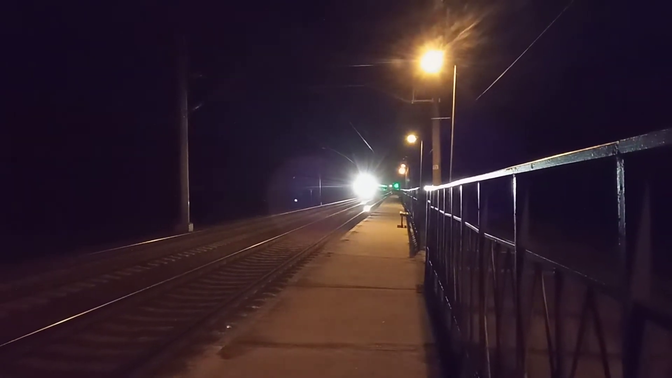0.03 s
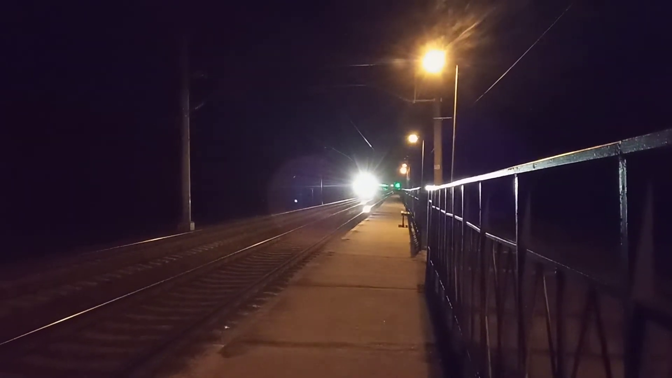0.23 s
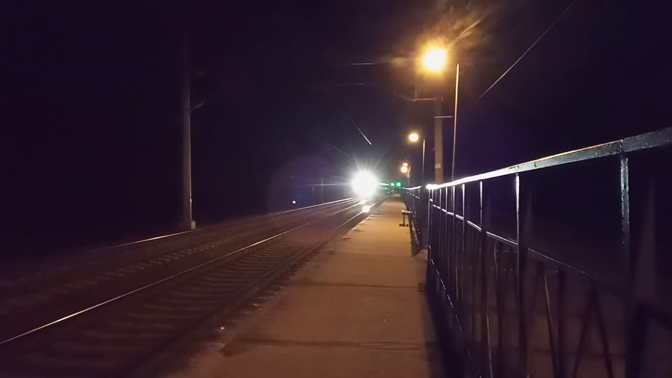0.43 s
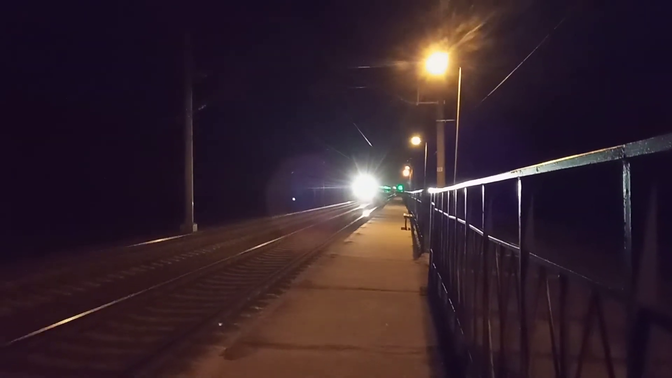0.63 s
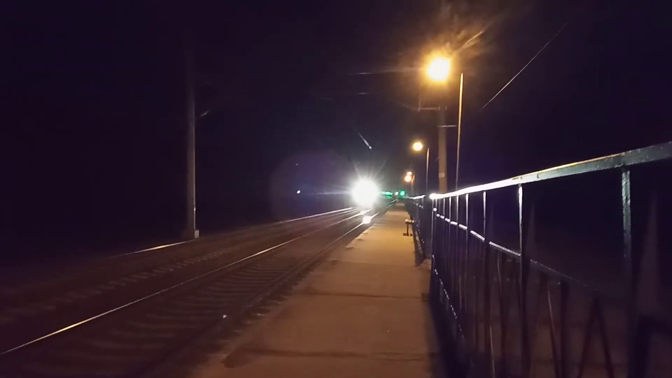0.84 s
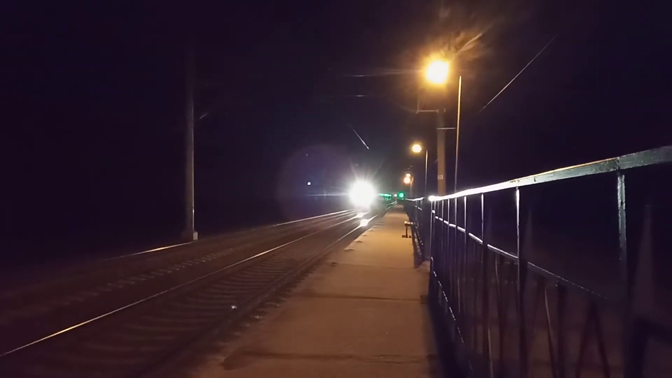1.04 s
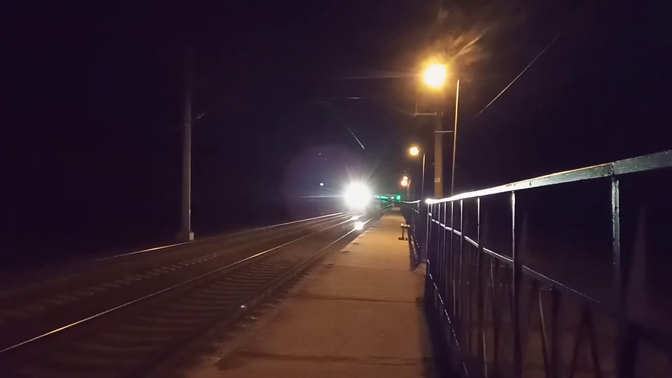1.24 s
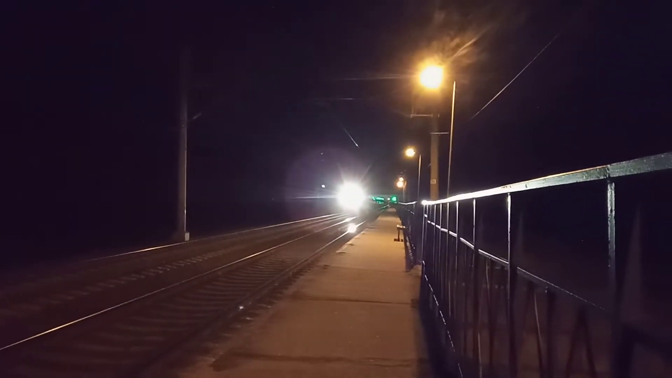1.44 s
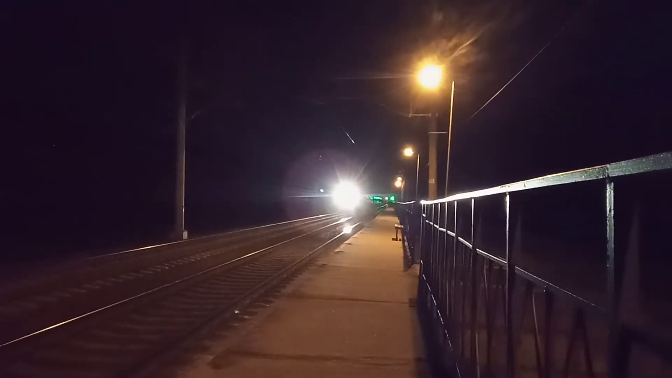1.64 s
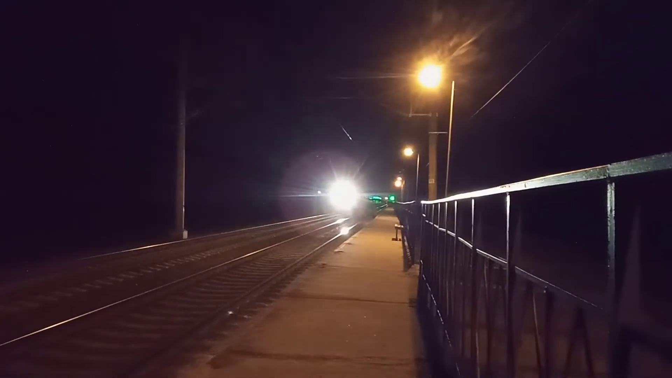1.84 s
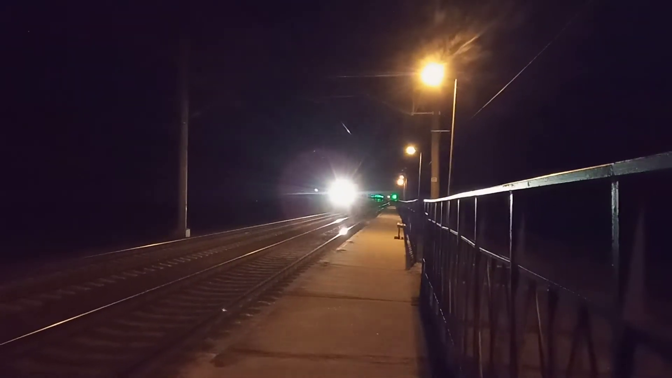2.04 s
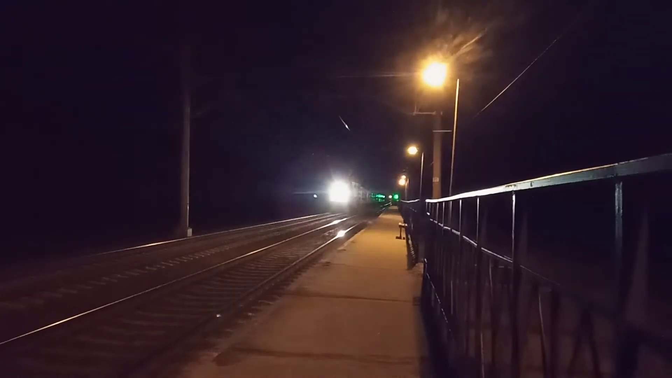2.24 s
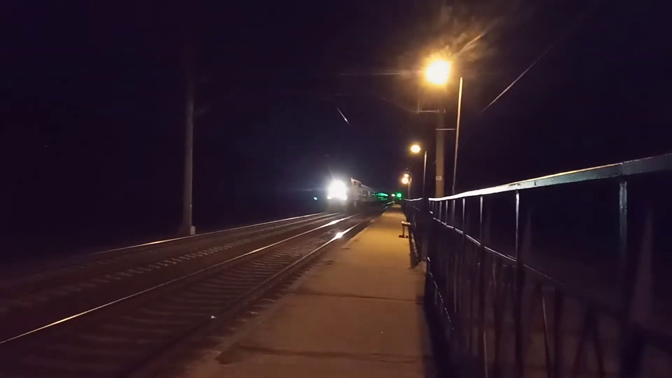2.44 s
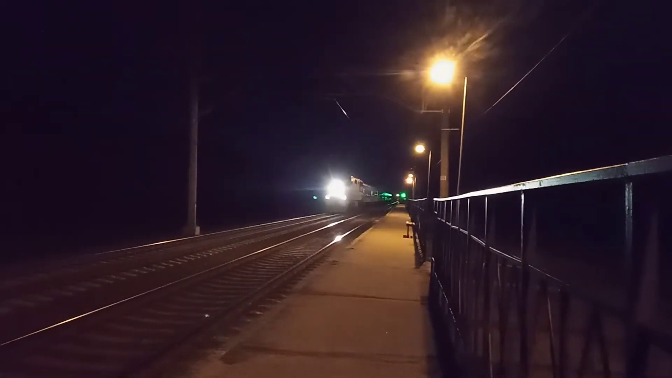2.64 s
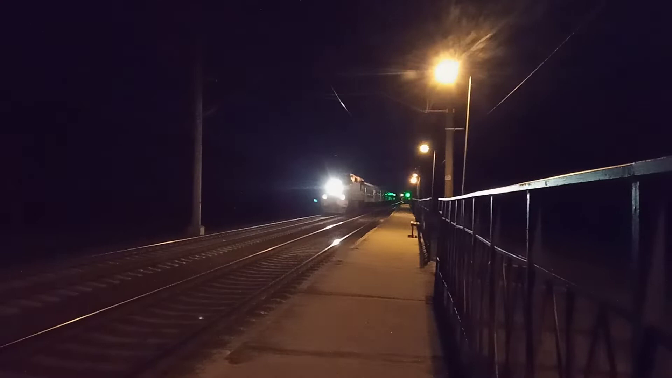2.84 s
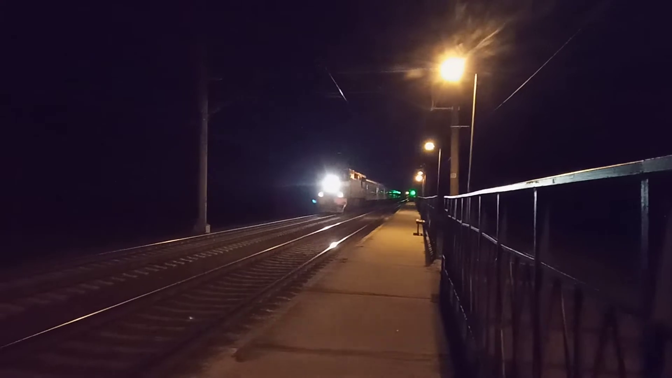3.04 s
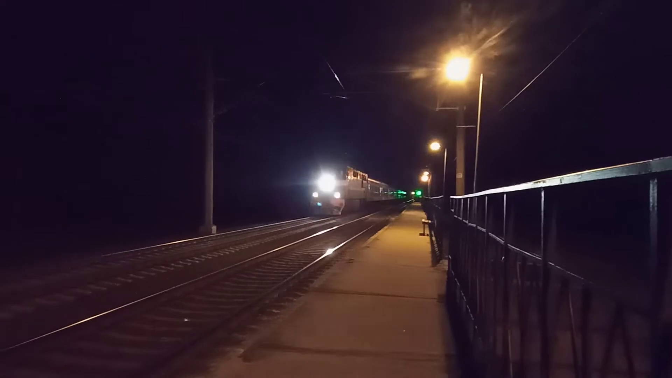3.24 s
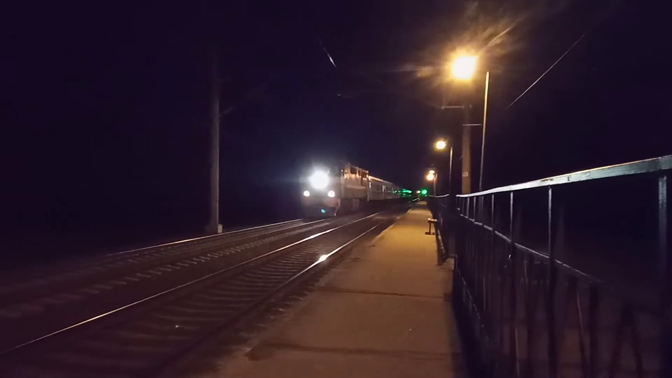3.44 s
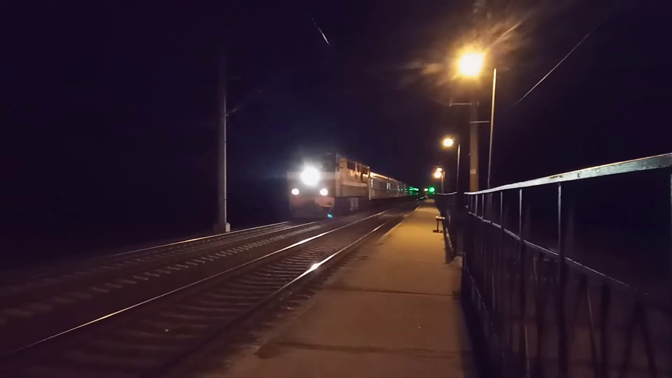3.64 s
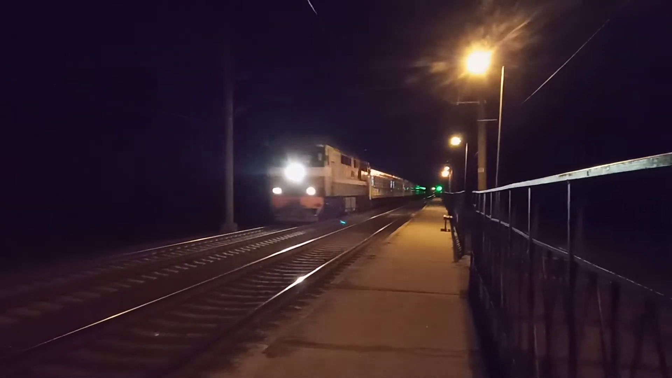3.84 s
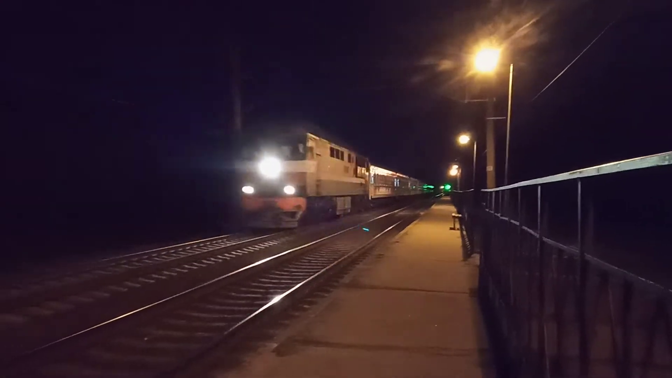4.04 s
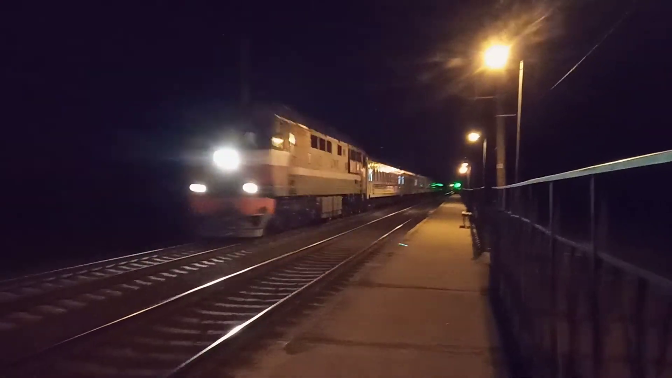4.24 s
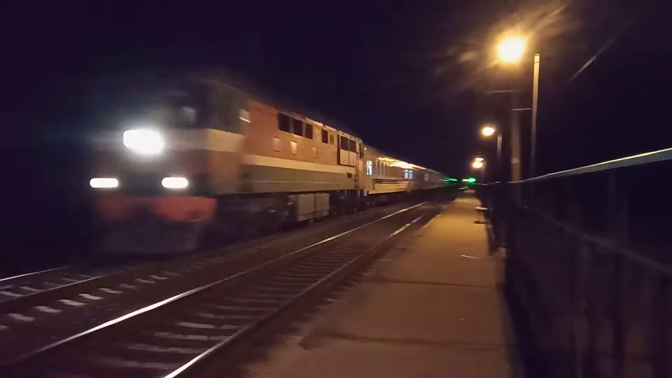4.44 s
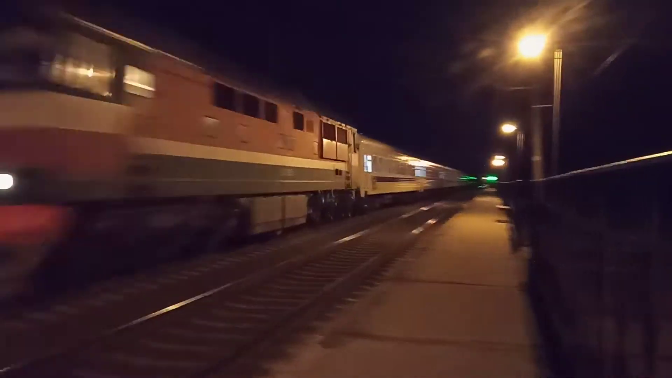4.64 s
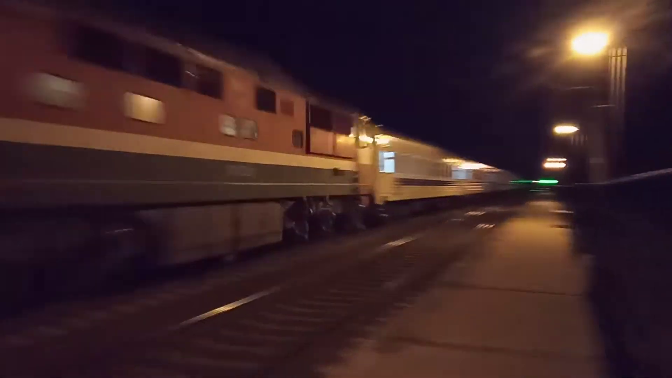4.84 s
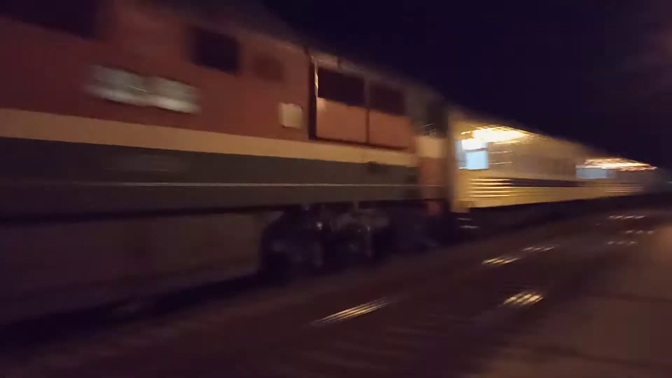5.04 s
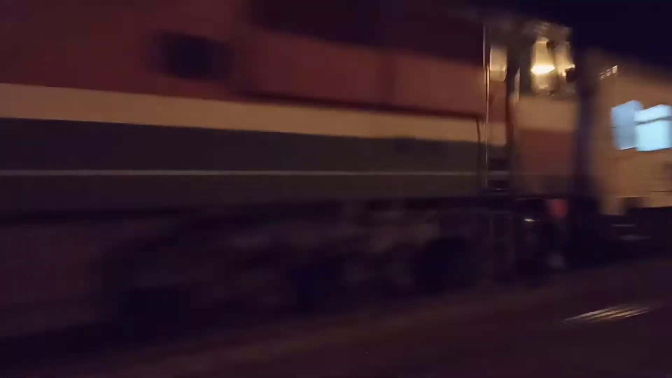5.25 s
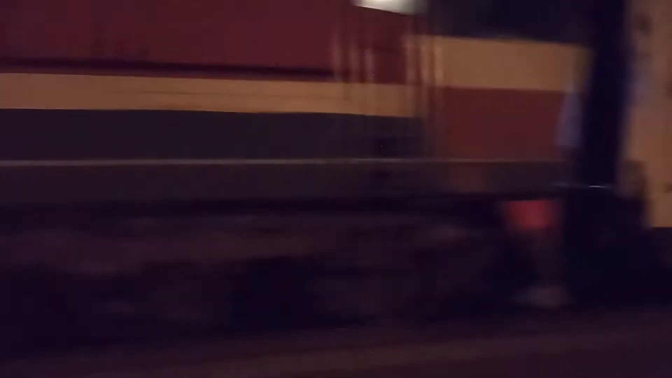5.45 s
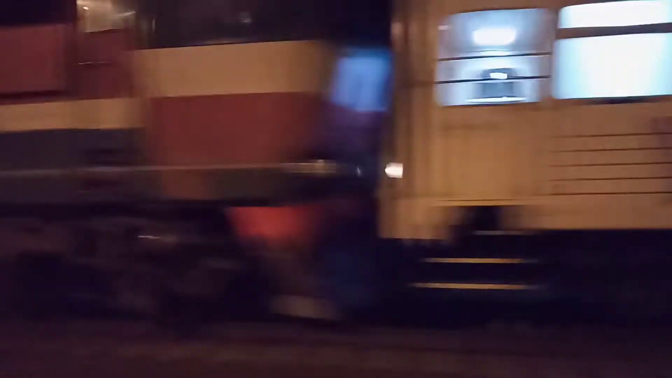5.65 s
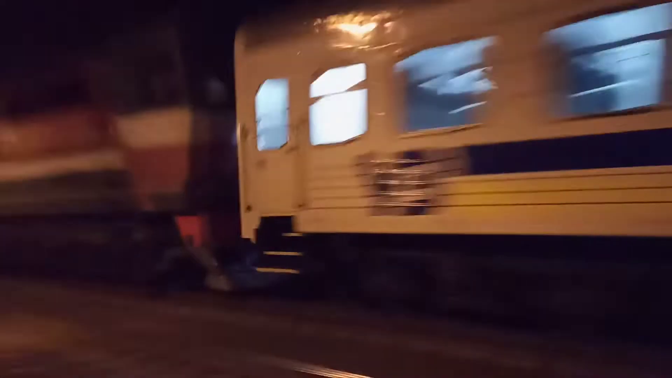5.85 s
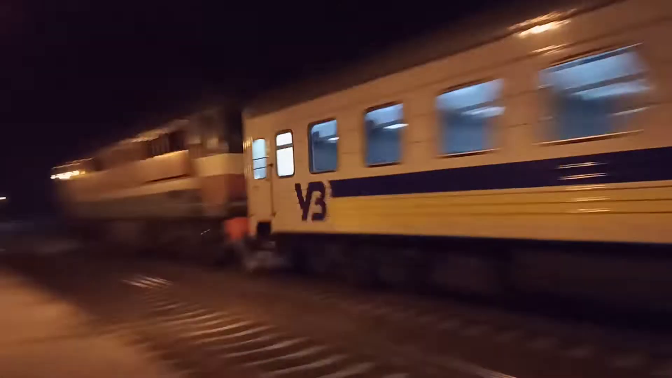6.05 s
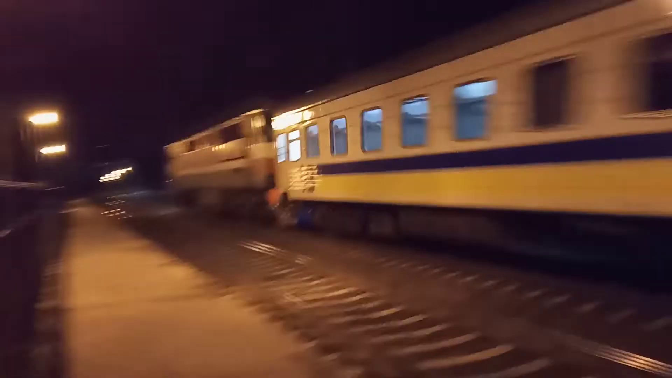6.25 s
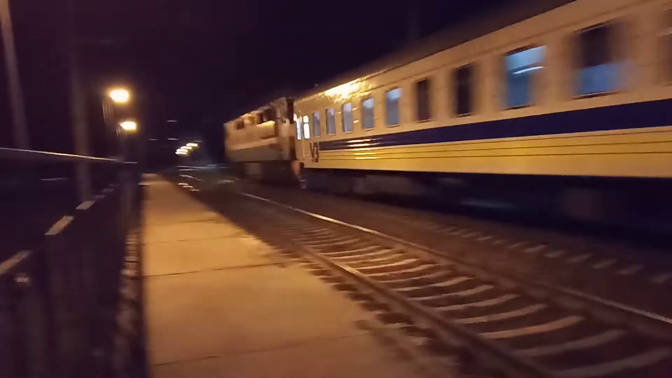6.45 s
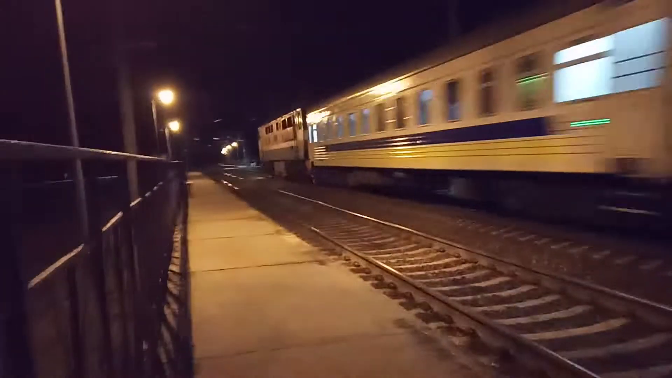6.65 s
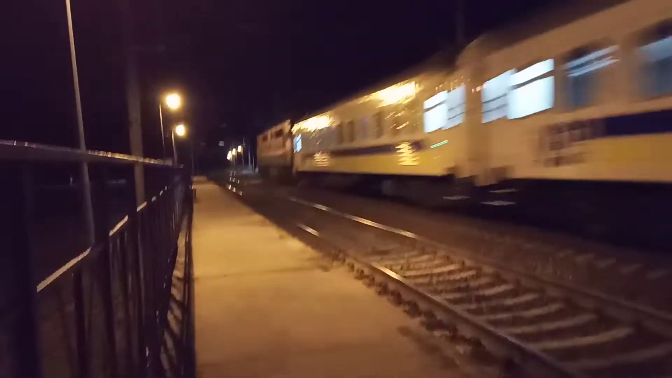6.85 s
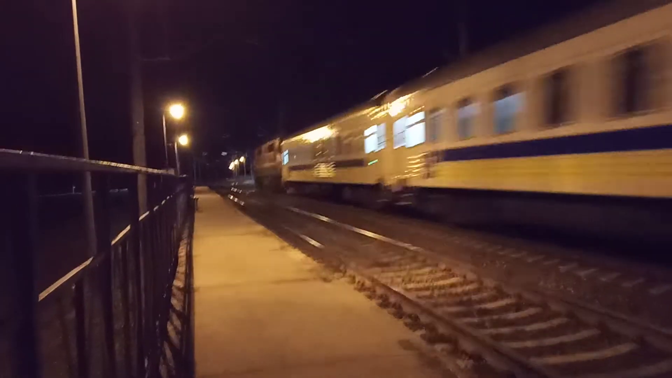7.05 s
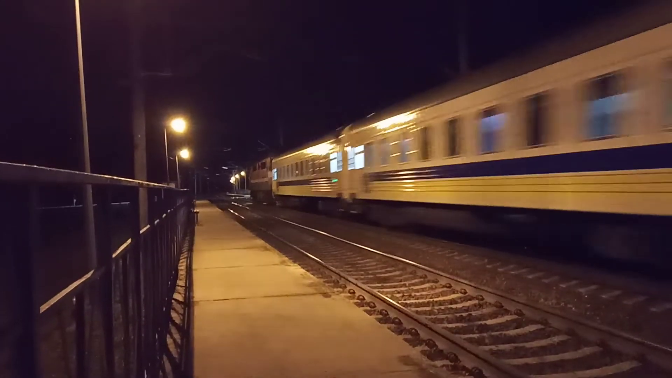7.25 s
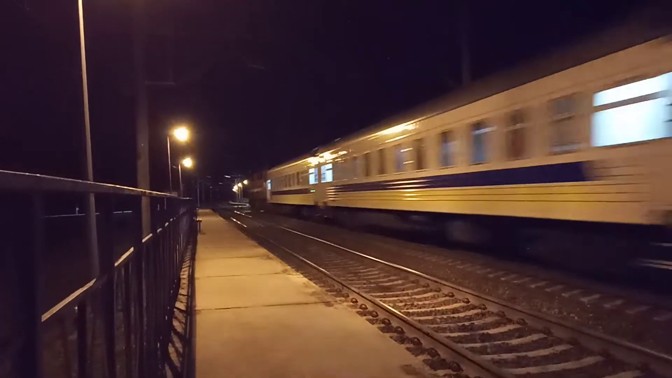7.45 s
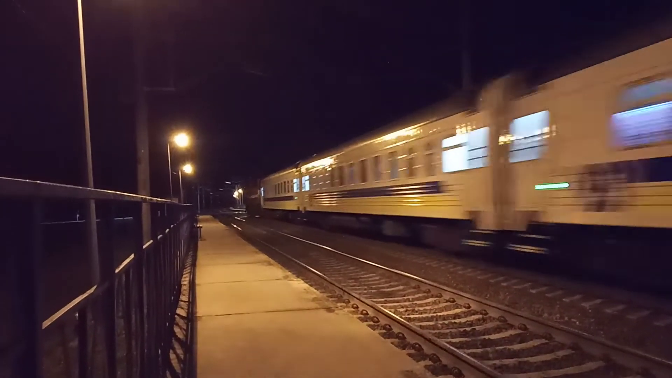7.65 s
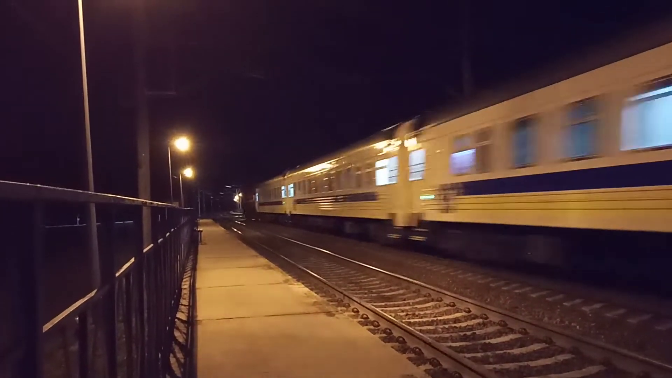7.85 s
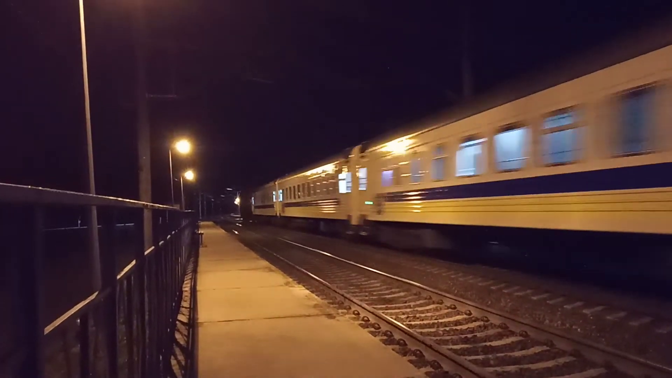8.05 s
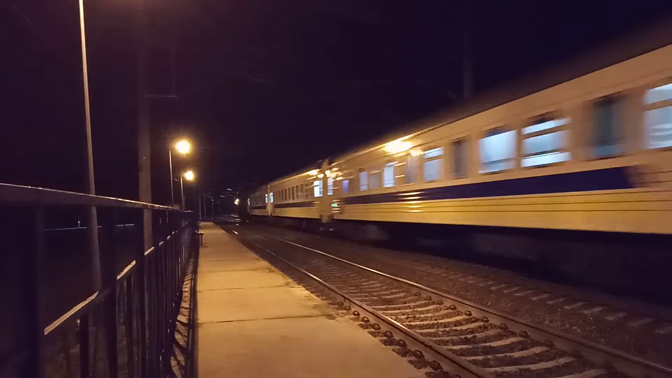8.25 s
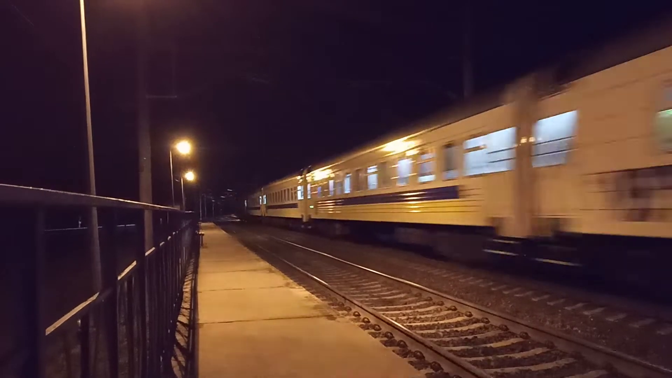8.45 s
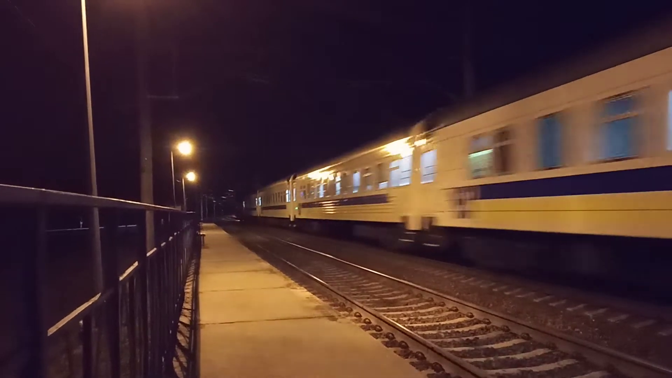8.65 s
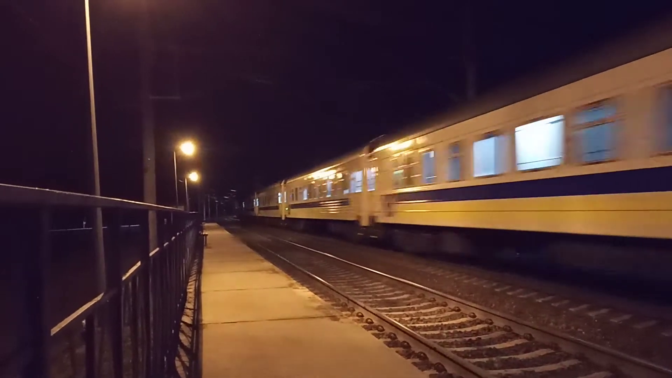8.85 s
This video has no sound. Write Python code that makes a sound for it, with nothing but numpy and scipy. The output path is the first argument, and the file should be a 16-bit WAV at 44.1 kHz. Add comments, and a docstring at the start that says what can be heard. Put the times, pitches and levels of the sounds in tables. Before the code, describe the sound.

Rails sing as a diesel train approaches, its throbbing engine passing close, followed by coaches roaring and thudding along the track.

```python
"""A station platform at night, a phone microphone 6.8 m from the track, a diesel train running through.
From far down the line the rails sing and tick with the wheel noise carried in the steel. The exhaust
throbs closer and drops in pitch, with the turbocharger whistle and fan growl, as the engine passes the
microphone at about 5.3 s. Then the coaches, close up: wheels roar, ring and thud over the rail welds."""
import sys
import numpy as np
from scipy import signal
from scipy.fft import rfft, irfft, next_fast_len
from scipy.io import wavfile

SR = 44100
rng = np.random.default_rng(int(sys.argv[2]) if len(sys.argv) > 2 else 0)


def master(y):
    """Save y as 16-bit WAV."""
    cut = np.clip(np.atleast_2d(y).T, -1, 1)
    pcm = np.round(cut * 32767)  # scale
    wavfile.write(sys.argv[1], SR, pcm.astype(np.int16))


N = 392931
T = np.arange(N) / SR
FREQS = np.fft.rfftfreq(next_fast_len(N, True), 1 / SR)

TRAIN_M_PER_S, SOUND_M_PER_S = 30.2, 343.
TRACK_M, ABREAST_S = 6.8, 5.33  # microphone to track; engine level with the microphone
FIRST_BOGIE_S = 5.73  # first coach bogie at the near weld
COACH_S, BOGIE_S, AXLE_S = .831, .574, .081  # coach to coach, front to rear bogie, axle to axle

# bands the rails carry ahead of the train: f/Hz, width/Hz, level/dB before loss and fade, loss/dB per 100 m
RAIL_BANDS = [(284, 103, -44, 3), (466, 137, -37.5, 9.5), (910, 890, -37.5, 5), (1254, 91, -34, 23),
              (1488, 135, -35.5, 8), (1660, 120, -41.5, 5.5), (2265, 130, -43.5, 14),
              (2640, 220, -44.5, 13.5), (3340, 330, -40.5, 11.5), (4150, 660, -49.5, 8),
              (4950, 380, -44, 17.5), (6680, 270, -41, 21.5), (7420, 610, -43, 22), (8830, 580, -43.5, 24),
              (9560, 250, -52.5, 8), (10500, 1100, -48.5, 14.5), (12020, 1000, -51, 4),
              (13400, 500, -56, 3), (14300, 800, -54, 1), (15500, 900, -57, 4)]
# the rail song fades as the train draws level: t/s, gain/dB
RAIL_SONG_FADE = [(0, -1.5), (2.5, -0.5), (4.3, -0.5), (4.9, -6), (5.8, -14.5), (8.9, -21)]
# exhaust lines: multiple of the four-stroke cycle rate, relative level/dB
EXHAUST_LINES = [(5, -21), (6, -29), (7, -16), (8, -4), (9, -10.5), (10, -35), (11, 1.5), (12, -8.5),
                 (13, -7.5), (14, -34), (15, -17), (16, -10.5), (17, -48), (18, -25), (19, -8), (20, -10),
                 (21, -24), (22, -19), (29, -19), (32, -11.5), (34, -19), (35, -16), (36, -19)]
# exhaust thrown back from far down the line: t/s, level/dB
EXHAUST_ECHO = [(0, -67), (4.5, -64), (5.8, -37.5), (6.4, -38), (7.2, -44.5), (8.9, -51.5)]
# noise spectra of exhaust gas, wheels, bogies and track bed: f/Hz, relative level/dB
BOOM_SPECTRUM = [(90, 1), (130, -12), (160, -5.5), (190, -5.5), (249, -0.5), (296, -5.5), (335, -18),
                 (390, -15)]
ROAR_SPECTRUM = [(330, -11), (370, -13.5), (450, -5), (492, -3.5), (570, -4.5), (630, 1), (693, -2),
                 (771, -8), (1050, -14), (1130, -14), (1270, -7), (1500, -17)]
WHEEL_SPECTRUM = [(650, -48), (1100, -32), (1240, -26.5), (1420, -2.5), (1590, 0.5), (1880, -5), (2130, -5),
                  (2380, -12.5), (2620, -31), (2900, -15.5), (3770, -43), (6380, -120)]
HISS_SPECTRUM = [(2200, -14), (2500, 0), (2680, -4), (3320, -2.5), (3800, -2), (4250, -4.5), (4600, -3.5),
                 (4950, -8), (5250, -6), (6600, -6), (7900, -16.5), (10000, -16), (11800, -24.5),
                 (13200, -26), (15700, -33)]
RUMBLE_SPECTRUM = [(55, -40), (76, -21), (102, -19), (145, -0.5), (231, 1), (260, -2.5), (327, -9),
                   (400, -8.5), (450, -7)]
BALLAST_SPECTRUM = [(190, -13), (330, -12.5), (597, -1.5), (798, -6.5), (895, -4.5), (1180, -10.5),
                    (1310, -7), (1400, -1.5), (1820, -23), (3080, -120)]
# wheel modes of all the coaches together: f/Hz, width/Hz, level/dB against the hiss
SHEEN_MODES = [(3130, 190, -5), (4210, 430, 0), (4920, 120, -10.5)]
# each source going by the microphone:
# loudest t/s, base level/dB, reach/m, loss/dB per doubling of distance coming, the same going
THROB_PASSBY = (5, -27.5, 21.5, 7, 22)
BOOM_PASSBY = (5, -26, 20, 10, 12)
ROAR_PASSBY = (5, -24, 9.5, 5.5, 8.5)
FAN_PASSBY = (5.33, -29.3, 14.5, 14.5, 16)
RUMBLE_PASSBY = (6.5, -36, 15, 24.5, 0.7)
# rolling noise, same columns: a row for the locomotive, a row for the line of coaches
WHEEL_PASSBY = [(4.95, -37.5, 20, 10.3, 4), (6.12, -28.5, 9, 7.7, 0)]
HISS_PASSBY = [(5.2, -38.5, 32.4, 17.6, 37), (6, -37, 12, 11, 0)]
BALLAST_PASSBY = [(5.5, -25, 5.7, 14, 5), (6.3, -30.5, 12.7, 14, 0)]
# turbocharger whistle, same columns: a row per partial
TURBO_PASSBY = [(5.09, -38.5, 23.4, 16.5, 20), (5.28, -37.5, 5.9, 11, 14), (5.25, -50, 5.6, 14, 18)]
# the fan swells at each end of the locomotive: t/s, half length/s, gain/dB
GROWL_SWELLS = [(4.84, .09, 13.5), (5.53, .1, 7.5)]
# the whistle flares as the engine's side sweeps past: t/s, half length/s, partial, gain/dB
WHISTLE_FLARES = [(4.87, .045, 1, 5), (5.218, 0.024, 1, 17), (5.47, .055, 1, 12), (5.303, 0.022, 2, 9.5)]
# the locomotive's axles at the near weld: t/s
LOCO_AXLE_TIMES = [5.07, 5.174, 5.43, 5.531]
# welds by the platform: delay/s after the near one, relative level/dB, clank/dB against the thud
PLATFORM_WELDS = [(0, -20.5, -8.5), (.155, -24, -3)]
# modes of the track under an axle: f/Hz, t60/s, relative level/dB
THUD_MODES = [(139, 0.089, -0.5), (188, 0.055, 10.5), (227.5, 0.098, 4), (254.3, 0.13, -2)]
# modes of every coach bogie: f/Hz, delay/s after it meets the near weld, relative level/dB
BOGIE_MODES = [(1530, 0.24, -37), (3330, .16, -35.5), (4280, -.06, -36), (4950, .13, -36)]
# single wheels ringing briefly as they pass, some loud, some faint:
# t/s, half length/s, f/Hz, relative level/dB
SINGLE_WHEEL_RINGS = [(5.235, .03, 5120, -39), (5.66, .08, 5230, -41), (5.66, 0.094, 4310, -30.5),
                      (5.7, 0.089, 3510, -28.5), (5.85, 0.046, 4020, -32), (5.87, .04, 4800, -46),
                      (5.902, .1, 1477, -28), (6.201, 0.096, 1665, -24), (6.72, .06, 4950, -35),
                      (8.6, 0.11, 3750, -34), (8.62, .1, 5450, -38), (8.78, .06, 4280, -38),
                      (8.85, .09, 3480, -33)]
# the track bed roars up once under each coach: t/s, half length/s, gain/dB
TRACK_BED_SURGES = [(5.97, 0.14, 4.5), (6.854, 0.14, 0.6), (7.72, 0.12, 3.5), (8.42, 0.15, 2)]


def undb(db):
    """Decibels to gain."""
    return 10 ** (np.asarray(db) / 20)


def fader(points):
    """Level in dB per sample, drawn through (t/s, level/dB) points."""
    return np.interp(T, *np.transpose(points))


def bell(s, half_s):
    """A smooth bump of height 1 around a moment."""
    return np.exp(-((T - s) / half_s) ** 2 / 2)


def walk(rate, part=slice(None)):
    """A smooth random drift that turns rate times a second; spread 1."""
    knots = rng.standard_normal(4096)
    place = T[part] * rate
    k = place.astype(int)
    ease = np.sin(np.pi / 2 * (place - k))
    return knots[k % len(knots)] * np.sqrt(1 - ease ** 2) + knots[(k + 1) % len(knots)] * ease


def rough_tone(phase, rate, part=slice(None)):
    """A tone whose size and phase wander rate times a second; rms 1."""
    return walk(rate, part) * np.sin(phase) + walk(rate, part) * np.cos(phase)


def noise(gain, band=slice(None)):
    """Noise with a gain per frequency; rms 1 inside the band."""
    bins = gain * np.exp(2j * np.pi * rng.random(len(FREQS)))
    return irfft(bins)[:N] * len(FREQS) * np.sqrt(2 / np.sum(gain[band] ** 2))


def coloured(spectrum, low_hz, high_hz):
    """Noise shaped by (f/Hz, level/dB) points; rms 1 between low_hz and high_hz."""
    hz, db = np.transpose(spectrum)
    gain = undb(np.interp(np.log(FREQS + 1), np.log(hz), db, left=-120, right=-120))
    return noise(gain, (FREQS > low_hz) & (FREQS < high_hz))


def resonance(hz, width_hz, comb=1):
    """Noise in one resonance, optionally split into lines by a comb of gains."""
    return noise(comb / (1 + ((FREQS - hz) / (width_hz / 2)) ** 2 / 2))


def doppler(abreast_s):
    """Pitch factor at the microphone for a point on the train that passes at abreast_s."""
    along_m = TRAIN_M_PER_S * (T - abreast_s)
    return 1 / (1 + TRAIN_M_PER_S / SOUND_M_PER_S * along_m / np.hypot(along_m, TRACK_M))


def passby_db(loudest_s, db, reach_m, coming_db, going_db):
    """Level at the microphone: it falls with distance, at one rate coming and another going."""
    doublings = np.log2(np.hypot(TRAIN_M_PER_S * (T - loudest_s), reach_m) / reach_m)
    return db - np.where(T < loudest_s, coming_db, going_db) * doublings


def train_gain(passbys):
    """Joint gain of unrelated sources going by: their powers add."""
    return np.sqrt(sum(undb(passby_db(*row)) ** 2 for row in passbys))


def coach_swell(lag_s):
    """One swell per coach, between -1 and 1, peaking lag_s after its front bogie."""
    since = T - FIRST_BOGIE_S
    return np.clip(2 * since / COACH_S, 0, 1) * np.cos(2 * np.pi * (since - lag_s) / COACH_S)


def bogie_times(coaches=4):
    """When the front and rear bogie of each coach reach the near weld."""
    return [FIRST_BOGIE_S + k * COACH_S + rear for k in range(coaches) for rear in (0, BOGIE_S)]


def axle_times():
    """When each axle of the train reaches the near weld."""
    return list(LOCO_AXLE_TIMES) + [s + lag for s in bogie_times() for lag in (0, AXLE_S)]


def rail_song(shimmer_db=1.2, sizzle_db=0.14, comb_db=2.0):
    """Wheel noise runs ahead to the platform in the steel, each band damped at its own rate."""
    away_m = TRAIN_M_PER_S * np.maximum(ABREAST_S - T, 0)
    # the many wave types of a rail split each band into narrow ringing lines
    lines_hz = np.geomspace(700, SR / 2, 520)
    comb = undb(comb_db * np.interp(FREQS, lines_hz, rng.standard_normal(len(lines_hz))))
    song = sum(resonance(hz, width, comb) * undb(db - loss * away_m / 100 + shimmer_db * walk(12))
               for hz, width, db, loss in RAIL_BANDS)
    return song * undb(fader(RAIL_SONG_FADE) + sizzle_db * walk(25.07))


def rail_ticks(tick_db=-43, fade_db_per_s=2.2, t60=.09, rise_s=.002, earlier_s=5.23):
    """Axles cross a weld far up the line; only the top band of each double tick survives the rail."""
    envelope, t = np.zeros(N), T[:SR // 4]
    tick = undb(-60 * t / t60) * (1 - np.exp(-t / rise_s))
    for s in np.array(axle_times()) - earlier_s:
        for lag_s, db in ((0, 0), (.039, -4)):
            start = int((s + lag_s) * SR)
            if start >= 0:
                envelope[start:start + len(t)] += undb(tick_db + db - fade_db_per_s * s) * tick
    return envelope * (resonance(13450, 600) + resonance(14600, 1400)) / np.sqrt(2)


def cylinder_throb(cycles, waver_db=2.0):
    """Unequal cylinders give a comb of lines; the low odd ones, in step, throb once a shaft turn."""
    out = 0
    for k, db in EXHAUST_LINES:
        in_step = k % 2 == 1 and k < 16
        offset = .04 * rng.standard_normal() if in_step else rng.random()
        out = out + undb(db + waver_db * walk(6)) * np.cos(2 * np.pi * (k * cycles + offset))
    return out / np.std(out)


def ground_dip(x, dip_hz=135, width_hz=70, depth=0.72, clear_s=2.9):
    """While the engine is far off, the ground bounce partly cancels one low band at the microphone."""
    shape = np.exp(-((FREQS - dip_hz) / (width_hz / 2)) ** 2 / 2)
    band = irfft(rfft(x, 2 * (len(FREQS) - 1)) * shape)[:N]
    return x - depth * np.clip((clear_s - T) / 2, 0, 1) * band


def exhaust(cycle_hz=6.252, puff_depth=0.046):
    """The throb and its distant echo, with gas boom and roar pulsing at sixteen firings a cycle."""
    pitch = doppler(ABREAST_S)
    cycles = np.cumsum(cycle_hz * pitch) / SR
    throb = cylinder_throb(cycles) * undb(passby_db(*THROB_PASSBY))
    # what lies ahead still hears the engine approaching, so the echo keeps the high pitch
    echo = cylinder_throb(T * cycle_hz * pitch[0]) * undb(fader(EXHAUST_ECHO))
    firing = np.cos(2 * np.pi * 16 * cycles)
    shaft = np.cos(2 * np.pi * 2 * cycles)
    boom = coloured(BOOM_SPECTRUM, 170, 330) * (1 + .4 * shaft) * undb(passby_db(*BOOM_PASSBY))
    roar = coloured(ROAR_SPECTRUM, 450, 800) * (1 + .1 * shaft) * undb(passby_db(*ROAR_PASSBY))
    return ground_dip(throb + echo + (boom + roar) * (1 + puff_depth * firing))


def rolling(swell_db=0.86, grit_db=0.65, flicker_db=3):
    """Rough treads on the rail: a roar at the wheel resonances, gritty hiss, a flickering sheen."""
    wheels = coloured(WHEEL_SPECTRUM, 1850, 2400)
    hiss = coloured(HISS_SPECTRUM, 5200, 6300)
    sheen = sum(resonance(hz, width) * undb(db + flicker_db * walk(10)) for hz, width, db in SHEEN_MODES)
    coach_share = np.clip((T - ABREAST_S) * 2, 0, 1)
    treble = (hiss + sheen * coach_share) * train_gain(HISS_PASSBY)
    roar = wheels * train_gain(WHEEL_PASSBY) * undb(swell_db * coach_swell(lag_s=-0.18))
    return (roar + treble) * undb(grit_db * walk(160))


def cooling_fan(blade_hz=608, abreast_s=5.55, octave_db=-16):
    """The fan at the rear of the locomotive growls: a rough blade tone and its octave."""
    phase = 2 * np.pi * np.cumsum(blade_hz * doppler(abreast_s)) / SR
    growl = rough_tone(phase, 85) + undb(octave_db) * rough_tone(2 * phase, 70)
    swell_db = sum(db * bell(s, half_s) for s, half_s, db in GROWL_SWELLS)
    return growl * undb(passby_db(*FAN_PASSBY) + swell_db)


def turbocharger(blade_hz=3262, abreast_s=5.345, flutter=0.004, flicker_db=2):
    """A slightly unsteady blade whistle and its overtones, flaring close to the microphone."""
    hz = blade_hz * doppler(abreast_s) * (1 + flutter * walk(130))
    phase = 2 * np.pi * np.cumsum(hz) / SR
    out = 0
    for k, row in enumerate(TURBO_PASSBY, 1):
        flare_db = sum(db * bell(s, half_s) for s, half_s, partial, db in WHISTLE_FLARES if partial == k)
        out = out + undb(passby_db(*row) + flare_db + flicker_db * walk(35)) * np.sin(k * phase)
    return np.sqrt(2) * out


def weld_thuds(gain_db=-4, loco_db=4.0, scatter_db=2.2, rise_s=0.0066, clank_t60=0.06):
    """At the platform welds each axle thuds the track and clanks its bogie, the locomotive's harder."""
    out, t = np.zeros(N + 2 * SR), T[:SR // 4]
    metal = resonance(760, 600)
    attack = 1 - np.exp(-t / rise_s)
    for s in axle_times():
        axle_db = gain_db + loco_db * (s in LOCO_AXLE_TIMES)
        for lag_s, weld_db, clank_db in PLATFORM_WELDS:
            force, *detunes = rng.standard_normal(1 + len(THUD_MODES))
            thud = sum(undb(db - 60 * t / t60) * np.sin(2 * np.pi * hz * (1 + .05 * detune) * t)
                       for (hz, t60, db), detune in zip(THUD_MODES, detunes))
            span = int((s + lag_s) * SR) + np.arange(len(t))
            clank = metal[span % N] * undb(clank_db - 60 * t / clank_t60)
            out[span] += undb(axle_db + weld_db + scatter_db * force) * (thud + clank) * attack
    return out[:N]


def wheel_rings(sag_per_s=0.21, blur_rate=220, ring_half_s=0.1, gain_db=-1, detune=0.0078):
    """Wheel modes ring sideways, so each reaches the microphone briefly, sagging in pitch as it passes."""
    out = np.zeros(N)
    rings = [(s + lag_s, ring_half_s, hz * (1 + detune * rng.standard_normal()), db)
             for s in bogie_times() for hz, lag_s, db in BOGIE_MODES]
    for s, half_s, hz, db in rings + list(SINGLE_WHEEL_RINGS):
        near = np.abs(T - s) < .5
        t = T[near] - s
        phase = 2 * np.pi * hz * (t - sag_per_s * t ** 2 / 2)
        out[near] += undb(db + gain_db) * bell(s, half_s)[near] * rough_tone(phase, blur_rate, near)
    return out


def coach_rumble(swell_db=2.5, flicker_db=.71):
    """Bogies rumble as each coach end passes the microphone; the track bed roars under each coach."""
    rumble = coloured(RUMBLE_SPECTRUM, 120, 330)
    ballast = coloured(BALLAST_SPECTRUM, 450, 1150) * train_gain(BALLAST_PASSBY)
    rumble_db = passby_db(*RUMBLE_PASSBY) + swell_db * coach_swell(lag_s=-0.013)
    surge_db = sum(db * bell(s, half_s) for s, half_s, db in TRACK_BED_SURGES)
    return rumble * undb(rumble_db) + ballast * undb(surge_db + flicker_db * walk(24))


def scene():
    """The whole train from one spot on the platform, the same in both channels."""
    engine = exhaust() + turbocharger() + cooling_fan()
    track = rail_song() + rail_ticks() + rolling() + coach_rumble() + wheel_rings() + weld_thuds()
    return np.array([engine + track] * 2)


def record(dry):
    """The phone cuts off steeply above 15.7 kHz."""
    return signal.sosfilt(signal.ellip(10, .1, 80, 15700, fs=SR, output="sos"), dry)


dry = scene()
out = record(dry)
master(out)
```